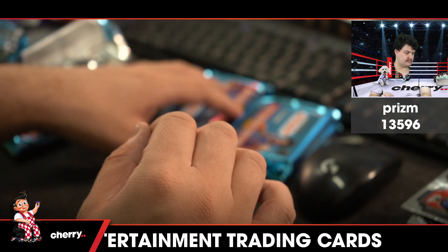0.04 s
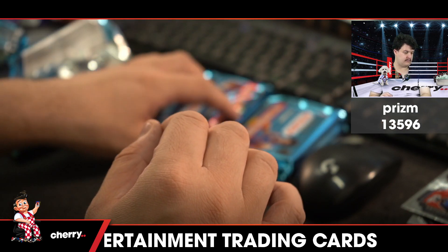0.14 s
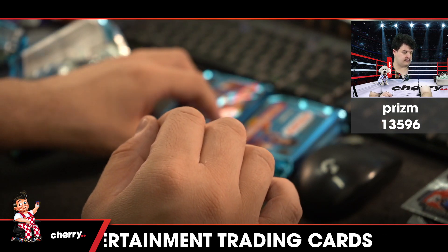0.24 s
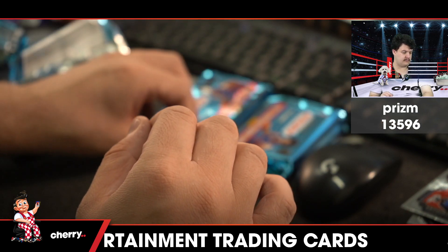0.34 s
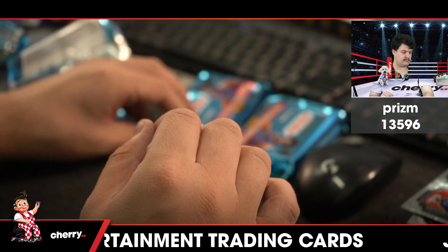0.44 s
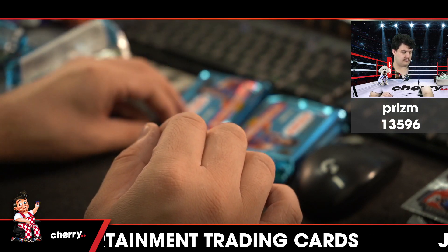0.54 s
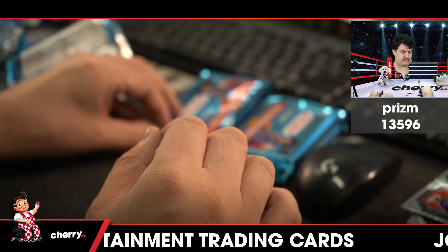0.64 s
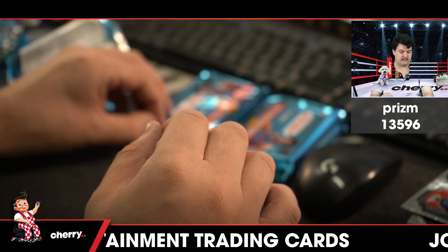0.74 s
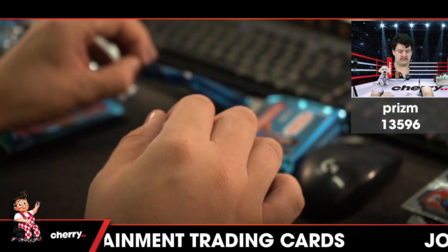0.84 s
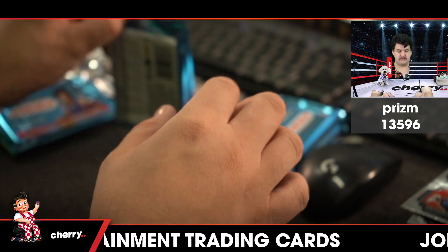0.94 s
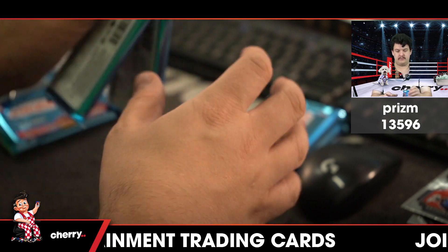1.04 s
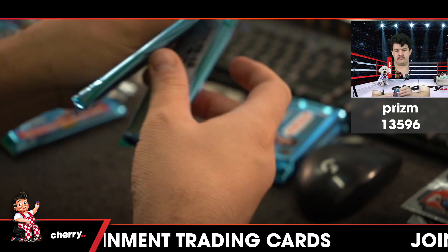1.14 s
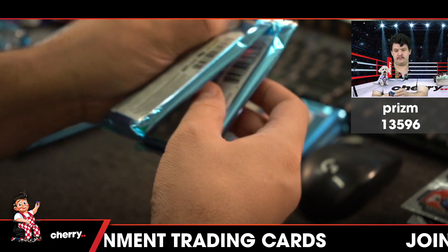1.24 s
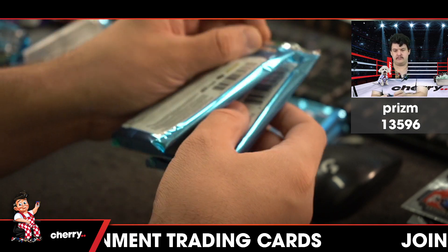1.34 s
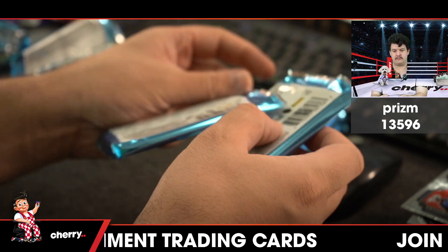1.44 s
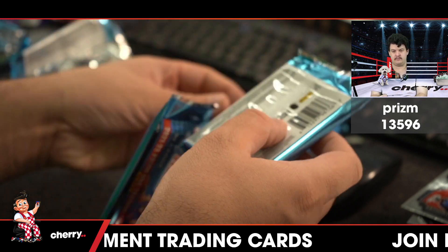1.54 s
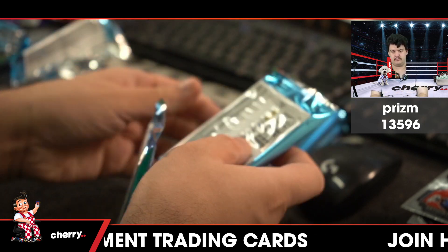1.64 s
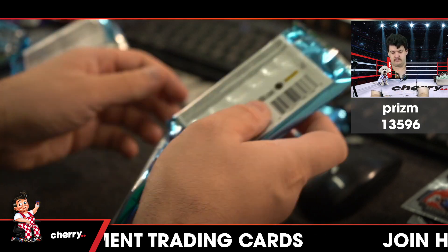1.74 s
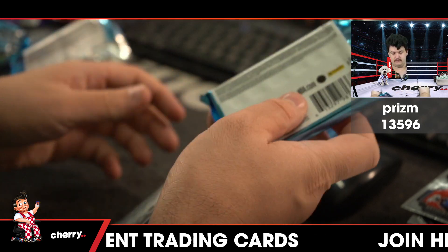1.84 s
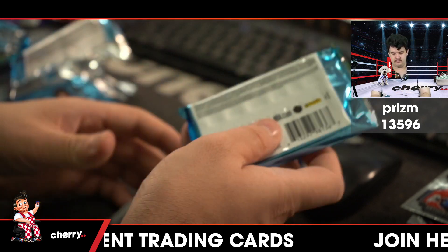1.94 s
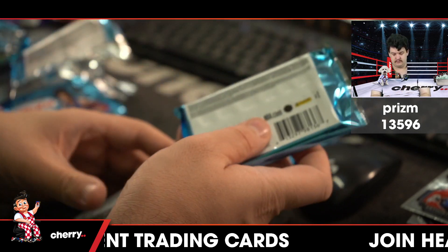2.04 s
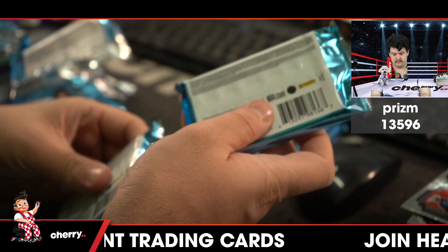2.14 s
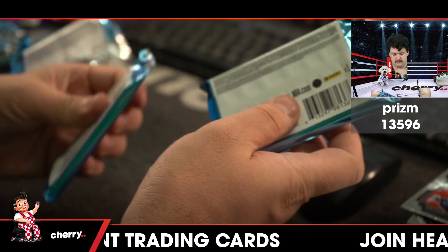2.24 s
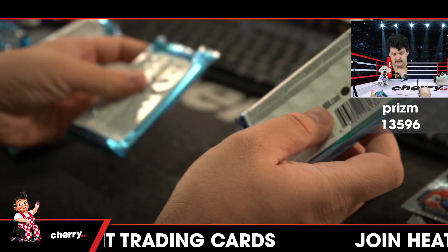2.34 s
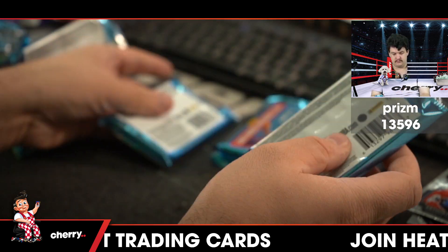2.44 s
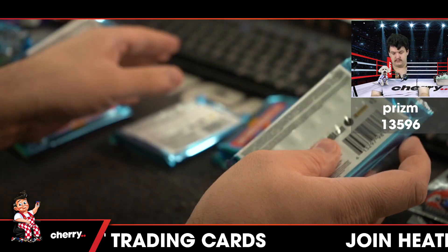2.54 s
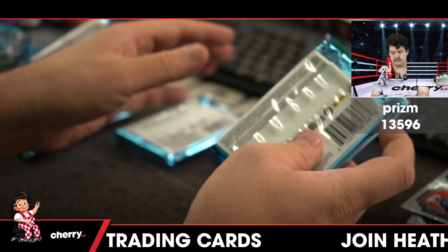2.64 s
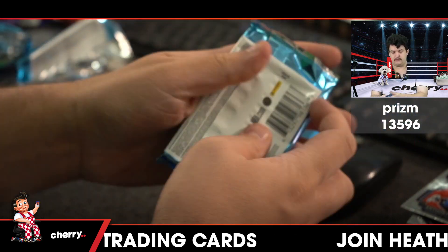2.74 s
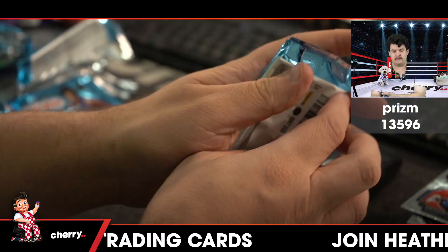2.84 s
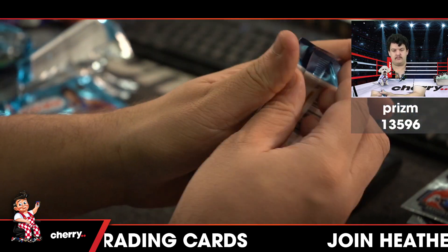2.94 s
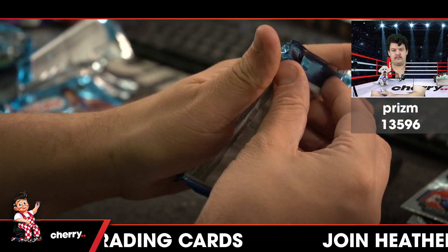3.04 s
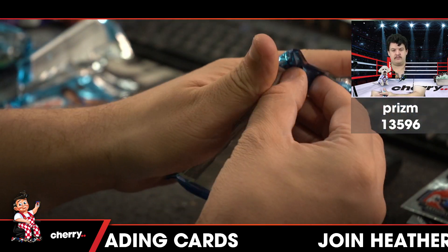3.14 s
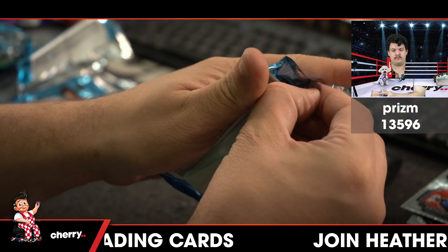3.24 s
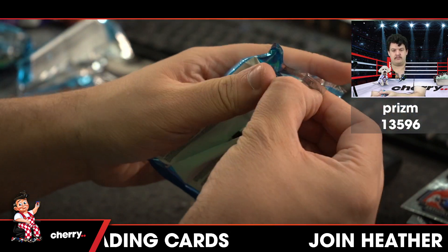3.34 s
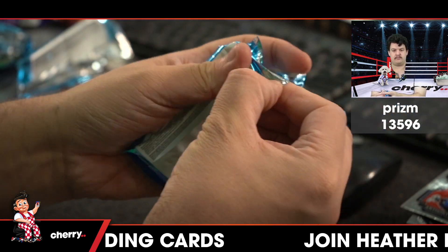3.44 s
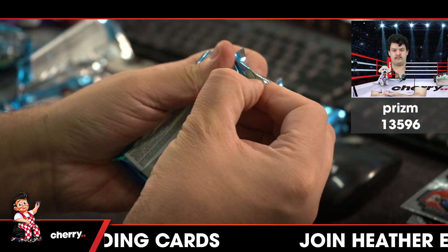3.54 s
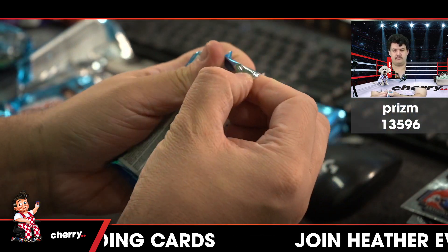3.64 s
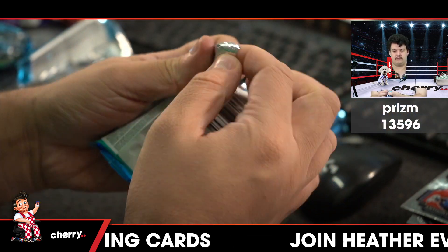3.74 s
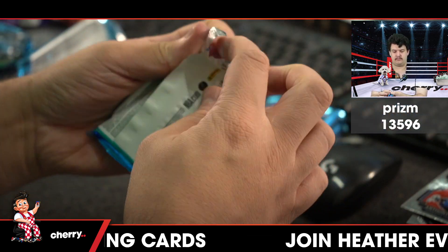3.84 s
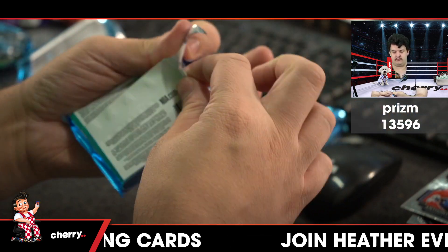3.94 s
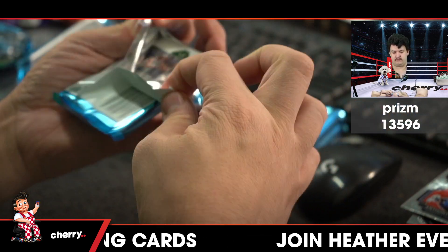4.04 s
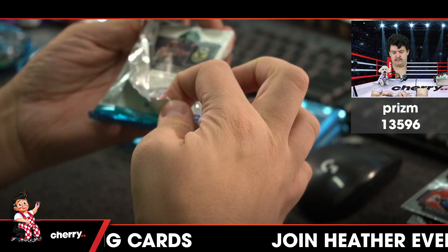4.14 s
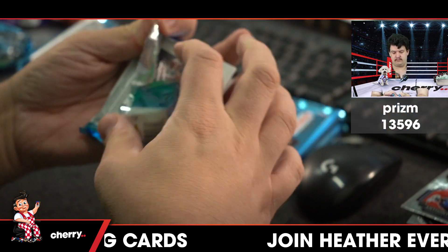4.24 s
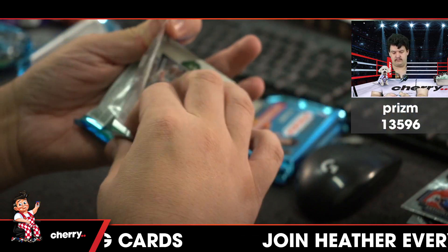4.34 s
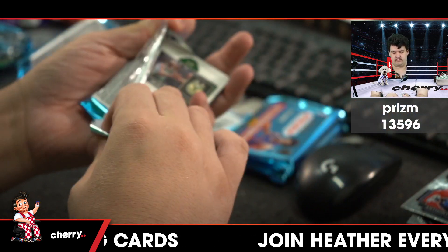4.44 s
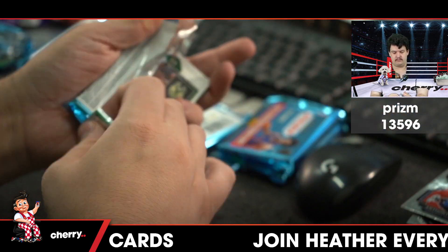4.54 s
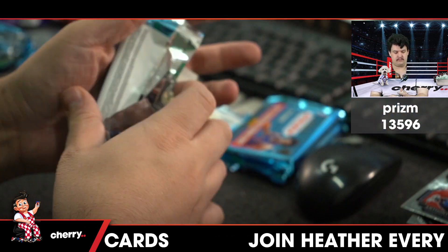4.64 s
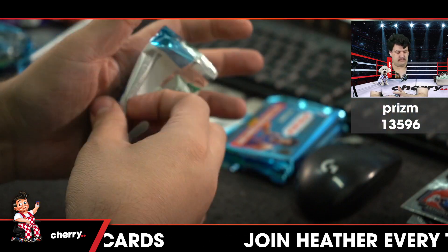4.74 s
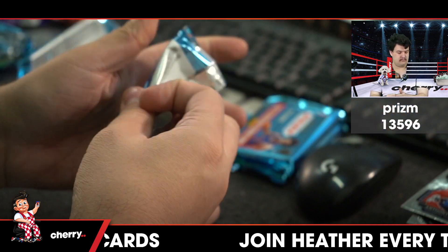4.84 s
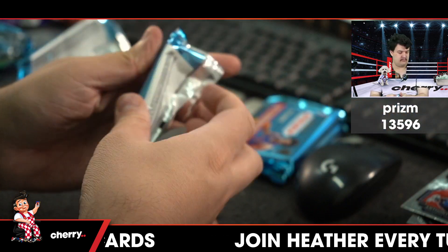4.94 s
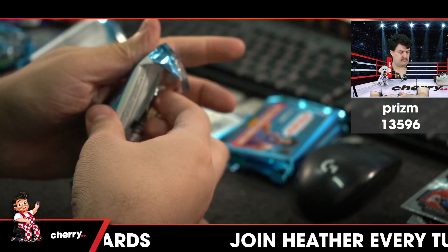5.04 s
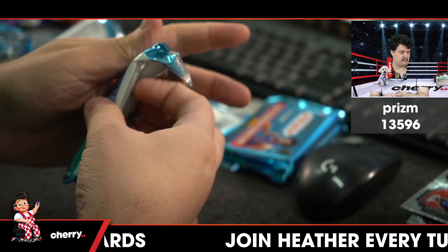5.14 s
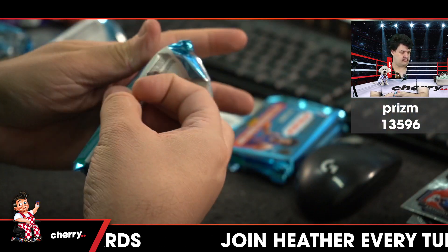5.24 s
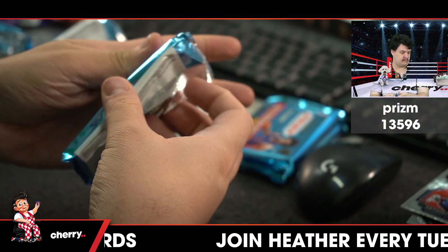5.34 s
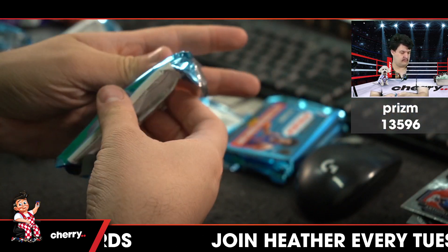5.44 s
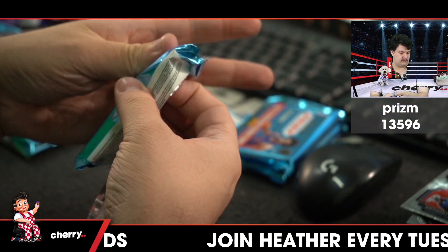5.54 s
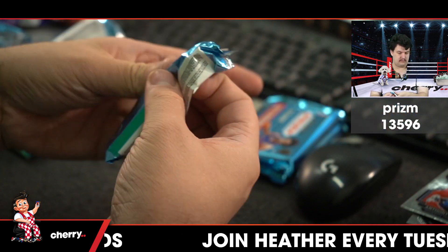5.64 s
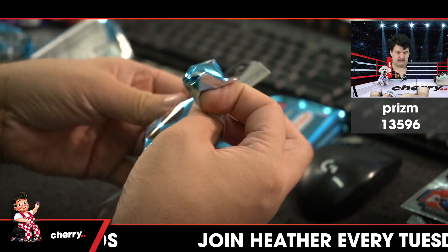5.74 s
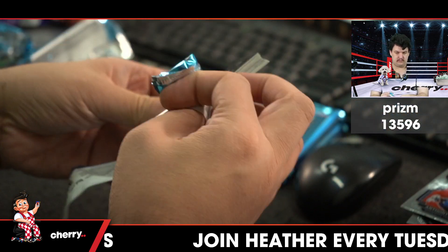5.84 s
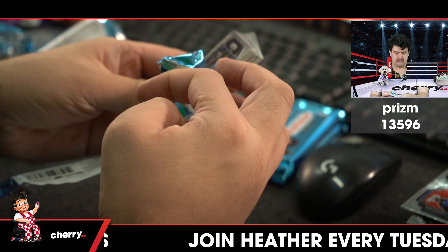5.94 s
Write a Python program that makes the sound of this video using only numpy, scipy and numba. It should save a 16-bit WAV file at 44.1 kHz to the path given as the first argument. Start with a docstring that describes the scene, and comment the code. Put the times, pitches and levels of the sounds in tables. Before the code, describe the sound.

Foil packs are picked up and crinkled close by, one drops softly on a desk, then after a lull the wrapper tears in dense crackles.

```python
"""Foil pack of cards handled over a desk in a small room, close to one microphone, for six seconds.
Hands take up the pack: a faint rustle grows into crackle, creases buckle in sharp snaps and the cards tap dully.
At 1.6 s a pack drops and the desk booms in its modes; a lull follows, with a weaker drop at 2.6 s.
From 2.8 s turning and tearing resume: coloured noise hisses, and resonant noise bursts snap more densely.
Throughout, the snaps and taps excite a decaying room tail, over a low murmur and faint hiss."""
import sys
import numpy as np
from scipy import signal
from scipy.fft import rfft, irfft, next_fast_len
from scipy.io import wavfile
from scipy.ndimage import uniform_filter1d
from numba import njit

SR = 44100
rng = np.random.default_rng(int(sys.argv[2]) if len(sys.argv) > 2 else 0)


def dump_mix(stems):
    """Bounce the given channels to the path in sys.argv[1] as a 16-bit WAV at rate SR."""
    frames = np.atleast_2d(stems).T  # one column per channel
    limited = np.clip(frames, -1, 1)  # hard clip at full scale
    pcm = np.round(limited * 32767).astype(np.int16)
    wavfile.write(sys.argv[1], SR, pcm)


N = 263718

# Reverberation of the room: f/Hz, time to fall 60 dB/s
ROOM_DECAY = [(300, 0.33), (3000, 0.59), (12000, 0.15)]
# Spectrum of rubbing skin, also of the room murmur: f/Hz, relative level per Hz/dB
RUB_SPECTRUM = [(35, -61), (60, -12), (199, -3), (417, -4.5), (797, -5), (1300, -10.5), (1700, -16),
                (2600, -20), (3380, -31), (5720, -120)]
# Modes of the desk top: f/Hz, relative level before a random spread/dB, time to fall 60 dB/s
DESK_MODES = [(134.4, -5.5, 0.67), (334, -7.5, .2), (170.5, 0, 0.5), (203.8, -2.5, 0.49), (262.7, -7, 0.56),
              (305.6, -2.5, 0.38), (483, -12, 0.32), (715, -14, 0.088)]
# A pack lands on the desk: t/s, nominal peak level/dB
DROPS = [(1.61, -24.5), (2.62, -33.5)]
# Spectrum of the foil: f/Hz, relative level per Hz/dB
FOIL_SPECTRUM = [(710, -23), (1200, -15), (1990, -12.5), (2420, -18), (2850, -8), (3360, -4.5),
                 (4470, -4.5), (5270, -4.5), (6430, -7), (8640, -6), (13500, -12.5), (15800, -18.5),
                 (16500, -57)]
# Fingers resting and shifting on the pack: t/s, foil rustle level/dB, rubbing level before RUB_GAIN_DB/dB
RESTING_GRIP = [(0, -89, -85), (.095, -83, -79), (.12, -71.5, -79), (.25, -62, -58), (.62, -57.5, -67),
                (1.1, -50, -61), (1.33, -58, -68), (1.86, -62, -62), (2.22, -65.5, -64.5),
                (2.44, -74, -77.5), (2.5, -70, -81), (2.53, -62, -67.5), (3.16, -60.5, -65),
                (3.9, -55, -62), (4.25, -60, -55.5), (4.6, -48.5, -61), (5.1, -52.5, -60.5),
                (5.33, -57, -63), (5.98, -48.5, -70)]
# One squeeze, turn or tear each: t of peak/s, peak level/dB, time to rise 10 dB/ms, time to fall 10 dB/ms,
# graininess (0-1)
SQUEEZES = [(.301, -40, 40, 110, .5), (.419, -45, 60, 38, 0.6), (0.562, -51.5, 115, 78, 0.68),
            (.657, -53.5, 48, 83, 0.38), (.789, -48.5, 50, 250, 0.7), (1.005, -46, 60, 150, 0.86),
            (1.226, -48.5, 150, 97, .7), (1.431, -42.5, 52, 129, 0.68), (1.665, -49.5, 19, 302, 0.67),
            (1.771, -48, 100, 57, 0.7), (2.06, -43, 105, 38, 0.61), (2.207, -51.5, 78, 21, 0.45),
            (2.802, -41.5, 6.5, 66, 0.68), (2.955, -46, 62, 122, 0.57), (3.227, -36.5, 21, 38, 0.4),
            (3.338, -39.5, 114, 100, 0.96), (3.437, -28.5, 43, 49, 0.56), (3.623, -43, 46, 90, 0.84),
            (3.734, -36.5, 27, 17, 0.85), (3.874, -44.5, 152, 100, 0.67), (4.034, -33, 57, 100, 0.6),
            (4.09, -25, 49, 40, 0.62), (4.124, -34.5, 30, 27, .4), (4.394, -32, 74, 23, 0.66),
            (4.49, -39.5, 150, 112, 0.8), (4.802, -40.5, 176, 52, 0.77), (4.997, -44, 50, 50, 0.54),
            (5.22, -45, 154, 62, .65), (5.472, -48, 150, 100, 0.73), (5.59, -39, 58, 76, .7),
            (5.767, -35, 36, 70, .45), (5.975, -42.5, 150, 100, 0.75)]
# Modes of the stack of cards in its wrapper: f/Hz, width of one resonator (used squared)/Hz, level/dB
PACK_MODES = [(570, 860, 7.5), (915, 170, -17), (1633, 670, 5)]
# The stack flexes or taps inside the wrapper: t/s, peak level/dB, f/Hz
KNOCKS = [(0.232, -46.5, 513), (0.2932, -35.5, 630), (0.3492, -32, 524), (0.9947, -44, 726),
          (1.0935, -39.5, 1750), (1.2135, -33.5, 1880), (1.228, -33.5, 494), (1.3386, -40, 1680),
          (1.374, -43.5, 2080), (1.4927, -37.5, 860), (1.601, -43, 710), (1.7803, -37.5, 1170),
          (1.8783, -44, 2080), (1.9355, -40.5, 730), (1.9612, -26.5, 550), (2.7993, -43, 830),
          (2.9401, -41, 1670), (3.0778, -41, 1250), (3.1759, -40.5, 1970), (3.2323, -37.5, 1830),
          (3.3387, -46, 600), (3.3983, -34, 550), (3.4601, -37.5, 595), (3.6141, -41, 1600),
          (3.6367, -36.5, 1520), (3.6642, -38, 448), (3.7427, -40, 517), (3.7653, -40, 600),
          (3.8693, -39, 644), (3.9569, -41, 1690), (3.9863, -50, 590), (4.0237, -34.5, 1740),
          (4.0884, -34, 700), (4.2022, -42.5, 597), (4.2635, -41, 1550), (4.6898, -44.5, 830),
          (4.8133, -36.5, 530), (4.8992, -32.5, 1900), (4.9308, -38, 1810), (4.951, -37, 860),
          (5.0762, -40.5, 1030), (5.6634, -48.5, 1600), (5.7751, -31.5, 597), (5.8307, -42.5, 560),
          (5.883, -40.5, 774)]
# Creases buckling that stand out from the rustle around them: t/s, nominal peak level/dB, centre f/Hz,
# nominal length/ms
SNAPS = [(0.106, -53, 4600, 7.2), (0.2143, -45, 3900, 2), (0.238, -38, 4530, 2.5), (0.262, -36, 5070, 3.8),
         (0.2964, -22.5, 6100, 1.1), (0.342, -30, 5100, 3.6), (0.4019, -25, 5200, 1.6),
         (0.4088, -23.5, 5250, 1.2), (0.5531, -36, 5300, 1.5), (0.6408, -34, 5730, 3.1),
         (0.7496, -33.5, 5330, 4.9), (0.775, -29.5, 5600, 2.4), (0.7894, -27, 5600, 0.83),
         (0.7943, -27, 8000, 1.6), (0.8469, -32.5, 7540, 1.1), (0.8679, -35, 4900, 1.2),
         (0.8929, -27, 5600, 0.96), (0.9104, -28.5, 5300, 1.8), (0.9223, -29, 4180, 1.2),
         (0.973, -31, 4900, 1.2), (0.995, -24, 6050, 2.1), (1.011, -22, 5700, 1.3),
         (1.0369, -33, 4230, 1.8), (1.0691, -19, 4300, 0.72), (1.0946, -19.5, 4100, 1.24),
         (1.1154, -25, 5500, 1.15), (1.1206, -25.5, 6800, 1.1), (1.147, -34, 6200, 3.7),
         (1.1775, -25.5, 6000, 2), (1.183, -27.5, 7700, 1.8), (1.2078, -25, 4530, 1.1),
         (1.215, -20.5, 4440, 2.6), (1.247, -28, 4600, 0.94), (1.2548, -26, 7800, 1.3),
         (1.267, -19, 4940, 0.46), (1.3398, -24, 5670, 1.4), (1.375, -25.5, 5630, 1.4),
         (1.391, -28.5, 6100, 2), (1.4203, -30, 5700, 2.4), (1.426, -21, 5040, 2.5),
         (1.4446, -21.5, 6400, 1.1), (1.4608, -23, 7650, 1.1), (1.477, -24.5, 7000, 1.5),
         (1.493, -24.5, 5340, 2.4), (1.504, -25.5, 5500, 1.4), (1.511, -23, 5350, 1.4),
         (1.537, -24.5, 6240, 4.5), (1.55, -28, 6400, 2.9), (1.6042, -31.5, 6400, 4.3),
         (1.6296, -25.5, 6000, 1.4), (1.651, -29.5, 5170, 4.5), (1.6818, -30, 5370, 1.7),
         (1.781, -28.5, 4540, 2.3), (1.8774, -36, 4660, 4.3), (1.88, -31.5, 3980, 4.7),
         (1.9564, -23.5, 3940, 7.1), (2.1486, -43.5, 4260, 18), (2.3482, -46, 4900, 1.7),
         (2.514, -51, 4200, 2.4), (2.621, -42, 4800, 2.9), (2.6586, -42.5, 3640, 0.88),
         (2.7965, -38, 4340, 1.7), (2.8243, -30.5, 5600, 2.4), (2.8506, -28, 7300, 1.4),
         (2.9126, -28.5, 7800, 1.8), (2.9191, -32, 6300, 1.7), (2.9407, -22.5, 7200, 2.5),
         (2.993, -30.5, 4250, 2.9), (3.0536, -43, 4300, 1.2), (3.0785, -36, 4800, 1.6),
         (3.0837, -29.5, 6200, 1.6), (3.1106, -37, 7800, 1.7), (3.1432, -45, 4500, 2),
         (3.1766, -22.5, 5400, 1.6), (3.1926, -17, 4660, 0.91), (3.2102, -28, 6900, 2.2),
         (3.2193, -28, 5340, 2), (3.23, -21, 6000, 7.7), (3.237, -22.5, 5760, 1.4),
         (3.2626, -29, 6000, 1.6), (3.28, -23.5, 7900, 1.1), (3.3059, -22.5, 6400, 2.7),
         (3.3232, -26, 4700, 1.6), (3.3293, -23, 5840, 1.5), (3.3394, -16, 5700, 1.2),
         (3.366, -24, 5300, 1.1), (3.392, -25, 6040, 1.3), (3.3976, -19, 7200, 3.6),
         (3.5197, -29, 4600, 1.9), (3.5383, -26, 6170, 1.5), (3.5511, -26.5, 3570, 2.2),
         (3.594, -28.5, 3600, 3), (3.613, -25.5, 4520, 2.1), (3.6277, -19.5, 3960, 0.64),
         (3.652, -27, 4500, 1.3), (3.6647, -27.5, 5400, 2.3), (3.674, -24.5, 3400, 2),
         (3.742, -24.5, 4660, 3.1), (3.765, -21, 7000, 3), (3.7886, -23.5, 4460, 1.4),
         (3.8042, -24, 3220, 1.1), (3.8127, -25.5, 7750, 1.3), (3.8277, -21, 4430, 1.1),
         (3.836, -22.5, 5500, 1.6), (3.8445, -23, 6840, 1.9), (3.8662, -24, 8900, 4.1),
         (3.8681, -28, 4840, 5.2), (3.8881, -16.5, 5200, 0.71), (3.951, -25.5, 6300, 2.9),
         (3.9574, -21.5, 4700, 1.9), (3.975, -22.5, 4800, 2.2), (3.9877, -11.5, 4500, 0.25),
         (3.993, -23.5, 4040, 1.3), (4.0246, -19, 4470, 5), (4.0492, -16, 4480, 2.1),
         (4.1082, -23, 7800, 1.5), (4.1229, -19.5, 5670, 2.3), (4.136, -21.5, 7000, 5.2),
         (4.1518, -18.5, 7000, 1.5), (4.1646, -26, 5700, 2.1), (4.1955, -26, 6000, 1.2),
         (4.2032, -21, 4700, 1.3), (4.235, -23, 4460, 2), (4.2648, -28, 6200, 0.88),
         (4.284, -32.5, 7100, 2.5), (4.3154, -23.5, 6700, 2.9), (4.3446, -26, 4300, 2.5),
         (4.401, -19.5, 5550, 3.2), (4.4478, -14.5, 5300, 1.3), (4.46, -25, 6100, 1.9),
         (4.481, -26, 5200, 2.1), (4.4905, -21, 5200, 1.9), (4.4997, -24, 5550, 3.4),
         (4.5333, -25.5, 7160, 1.6), (4.561, -26.5, 4870, 3.9), (4.5981, -23, 7500, 1.4),
         (4.6158, -27.5, 4660, 2), (4.6325, -27, 8150, 1.6), (4.6508, -28, 7200, 1.6),
         (4.6907, -27, 4600, 0.99), (4.8005, -28, 6070, 1.3), (4.8179, -25, 7300, 0.84),
         (4.8916, -25.5, 3320, 1.1), (4.899, -27, 5100, 4.3), (4.9314, -29, 5800, 1.9),
         (4.95, -24, 6350, 2.2), (4.986, -22.5, 5500, 1.16), (5.0437, -25, 5430, 2.4),
         (5.077, -26.5, 3520, 1.1), (5.0957, -29, 5400, 2.5), (5.1107, -24, 5060, 1.5),
         (5.1569, -27.5, 4320, 2.0), (5.1858, -22, 5640, 0.48), (5.1928, -30, 3660, 1.9),
         (5.2093, -30.5, 5100, 2.6), (5.2341, -25, 5400, 3.2), (5.2907, -40, 4800, 2.1),
         (5.35, -36.5, 3780, 3), (5.3853, -19, 7250, 2.7), (5.454, -31, 3800, 1.4),
         (5.469, -29, 4840, 0.65), (5.4727, -31, 7500, 3.5), (5.523, -37, 7500, 1.6),
         (5.542, -22.5, 4860, 1.2), (5.5456, -23.5, 7300, 1.15), (5.559, -28, 5400, 2.9),
         (5.58, -22, 5130, 0.96), (5.5941, -21.5, 5500, 2.1), (5.6234, -18, 5200, 1.4),
         (5.6662, -22.5, 5400, 1.2), (5.7189, -30, 7550, 1.4), (5.7398, -25, 5960, 0.68),
         (5.7449, -23.5, 7200, 1.6), (5.7621, -28, 8400, 3.1), (5.784, -24, 6500, 0.58),
         (5.7987, -22.5, 8100, 3.9), (5.831, -24, 5700, 1.8), (5.8742, -30, 6100, 1.5),
         (5.8836, -16, 5060, 2.1), (5.9267, -21.5, 6600, 1.55), (5.9398, -28, 5100, 2.3),
         (5.971, -24, 5800, 2.5)]

BAND_LIMIT_HZ = 16979
BURST_SAMPLES = 1024
LEAD_SAMPLES = 32  # room ahead of each burst's onset
RUB_AT_DB, RUB_GROWS = -59.5, 0.55  # rubbing in a squeeze of -45 dB, before the gain; dB per dB of squeeze
RUB_GAIN_DB = 1.0
REST_GRAINY = 0.4  # graininess between squeezes, 0-1


def amp(db):
    """Definition of level: the amplitude gain of a value in dB."""
    return 10 ** (np.asarray(db) / 20)


def unit(x):
    """Normalisation by power: x at rms 1."""
    return x / np.sqrt(np.mean(x ** 2) + 1e-20)


def along(points, hz):
    """Interpolation of (f, value) points on a logarithmic frequency axis."""
    f, value = np.transpose(points)
    return np.interp(np.log(hz + 1), np.log(f + 1), value)


def filtered(x, response):
    """Linear filtering: the spectrum of x times a complex response of frequency."""
    size = next_fast_len(N + SR // 2)
    spectrum = rfft(x, size) * response(np.fft.rfftfreq(size, 1 / SR))
    return irfft(spectrum, size)[:N]


def resonance(f, hz, width_hz):
    """Damped oscillator: causal response of one mode, 1 at its centre."""
    return 1j * f * width_hz / (hz * hz - f * f + 1j * f * width_hz)


def patchy(spectrum, patchy_db):
    """Filtered noise of rms 1 whose colour flickers in small patches of time and frequency."""
    z = signal.stft(rng.standard_normal(N), nperseg=256)[2]
    field = uniform_filter1d(rng.standard_normal(z.shape), size=5, axis=0)
    field = uniform_filter1d(field, size=4, axis=1)
    noise = signal.istft(z * amp(patchy_db * unit(field)), nperseg=256)[1][:N]
    return unit(filtered(noise, lambda f: amp(along(spectrum, f))))


def bursts(length_ms, response, size):
    """Transient excitation: a noise pulse per row, coloured by its response, with short-time peak level 1."""
    u = np.arange(size) / SR / (length_ms[:, None] / 1000 + 1e-4)  # time in lengths, each 0.1 ms longer
    shape = u ** 1.04 * np.exp(-3.1 * u)  # the crease runs, then lets go
    x = np.roll(rng.standard_normal(u.shape) * shape, LEAD_SAMPLES, axis=1)
    x = irfft(rfft(x) * response(np.fft.rfftfreq(size, 1 / SR)), size)
    power = uniform_filter1d(x ** 2, size=30)
    return x / np.sqrt(2 * power.max(axis=1, keepdims=True))


def placed(s, rows):
    """Superposition: rows of samples summed at their times."""
    start = np.round(s * SR).astype(int)[:, None] - LEAD_SAMPLES
    at = np.clip(start + np.arange(rows.shape[1]), 0, N)
    return np.bincount(at.ravel(), rows.ravel(), N + 1)[:N]


def floor():
    """Stationary background: a low murmur of the room over a faint microphone hiss."""
    murmur = amp(-78.5) * patchy(RUB_SPECTRUM, patchy_db=4.5)
    return murmur + amp(-87) * rng.standard_normal(N)


def room(x):
    """Reverberation: each frequency of the room's answer dies at its own speed."""
    hz, t, z = signal.stft(rng.standard_normal(SR // 2), SR, nperseg=256)
    decay = amp(-60 * t / along(ROOM_DECAY, hz)[:, None])
    tail = signal.istft(z * decay, SR, nperseg=256)[1]
    delayed = np.pad(x, (150, 0))  # samples
    return signal.fftconvolve(delayed, tail / np.linalg.norm(tail))[:N]


def drops():
    """Modal vibration: a soft blow rings the desk top's low modes, slightly rough as their phases wander."""
    out, t = np.zeros(N + SR), np.arange(SR // 2) / SR
    for s, db in DROPS:
        ring = np.zeros(len(t))
        for hz, mode_db, t60 in DESK_MODES:
            level_db = mode_db + rng.normal(0, 0.99) - 60 * t / t60
            phase_drift = np.cumsum(rng.normal(0, 0.024, len(t)))
            ring += amp(level_db) * np.sin(2 * np.pi * hz * t + phase_drift)
        thud = 1 + 3.4 * np.exp(-t / 0.007)  # the first swings are the strongest
        onset = 1 - np.exp(-t / 0.0034)
        out[round(s * SR):][:len(t)] -= amp(db - 10) * ring * thud * onset
    return filtered(out[:N], lambda f: 1j * f / (110 + 1j * f))  # keeps the boom above about 110 Hz


def effort():
    """Masking by the strongest: rustle dB, rubbing dB and graininess of the top squeeze or resting grip."""
    t = np.arange(0, N / SR + 0.001, 0.001)
    s, *columns = np.transpose(RESTING_GRIP)
    rest_db, skin_db = [np.interp(t, s, c) for c in columns]
    s, db, rise, fall, grain = np.transpose(SQUEEZES)[..., None]
    each_db = db - 10 * np.abs(t - s) * 1000 / np.where(t < s, rise, fall)
    squeeze_db = each_db.max(axis=0)
    strongest = each_db.argmax(axis=0)
    grainy = np.where(squeeze_db > rest_db, grain[strongest, 0], REST_GRAINY)
    grainy = uniform_filter1d(grainy, size=15)
    rustle_db = np.maximum(rest_db, squeeze_db)
    rub_db = np.maximum(skin_db, RUB_AT_DB + RUB_GROWS * (squeeze_db + 45))
    return [np.interp(np.arange(N) / SR, t, c) for c in (rustle_db, rub_db, grainy)]


def crease(hz, broad_db):
    """Resonant radiation: a crease rings at its own size and a random second one, in the foil's colour."""
    own = hz[:, None]
    second = (hz * np.exp(rng.normal(0, 0.42, len(hz))))[:, None]

    def response(f):
        ring = resonance(f, own, 0.36 * own) + 0.31 * resonance(f, second, 0.078 * second)
        return amp(along(FOIL_SPECTRUM, f)) * (ring + amp(broad_db))
    return response


def handling():
    """Friction and crackling noise: sliding or tearing foil hisses, tiny creases crackle, skin rubs."""
    rustle_db, rub_db, grainy = effort()
    count = 4000
    when = rng.uniform(0, N / SR, count)
    size = amp(3.6 * rng.exponential(1, count).clip(0, 3.5))
    length_ms = 1.18 * np.exp(rng.normal(0, 0.67, count))
    hz = 5500 * np.exp(rng.normal(0, 0.27, count))
    tiny = bursts(length_ms, crease(hz, broad_db=-14.5), BURST_SAMPLES // 4)
    crackle = unit(placed(when, size[:, None] * tiny))
    grainy = np.clip(grainy, 0, 1)
    hiss = patchy(FOIL_SPECTRUM, patchy_db=5.0)
    rustle = 1.55 * grainy * crackle + (1 - 0.75 * grainy) * hiss
    dull = filtered(rustle, lambda f: 1 / (1 + (f / 9000) ** 2))
    force = np.clip((rustle_db + 81) / 45, 0, 1)  # gentle handling is duller than tearing
    rustle = dull + force * (rustle - dull)
    rub = patchy(RUB_SPECTRUM, patchy_db=3.5)
    return amp(rustle_db) * rustle + amp(rub_db + RUB_GAIN_DB) * rub


def pack(f):
    """Modal superposition: the response of the pack's modes together."""
    return sum(amp(db) * resonance(f, hz, width_hz) ** 2 for hz, width_hz, db in PACK_MODES)


def knocks():
    """Modal excitation: in a dull tap one mode stands out over the rest of the pack."""
    s, db, hz = np.transpose(KNOCKS)
    centre = hz[:, None]

    def tone(f):
        return resonance(f, centre, 250 + 0.2 * centre) ** 2 + amp(-16) * pack(f)
    taps = bursts(np.full(len(s), 2.5), tone, BURST_SAMPLES)
    return placed(s, amp(db)[:, None] * taps)


def snaps():
    """Buckling instability: a crease ticks, rings, answers off the desk and faintly jolts the pack."""
    s, db, hz, ms = np.transpose(SNAPS)
    # The treble is over first
    tick = bursts(0.19 * ms, lambda f: amp(along(FOIL_SPECTRUM, f)) * f, BURST_SAMPLES)
    click = bursts(ms, crease(hz, broad_db=-9.5), BURST_SAMPLES) + amp(-13) * tick
    desk_answer = amp(-17.5) * np.roll(click, round(0.0034 * SR), axis=1)
    jolt = amp(-22.5) * bursts(ms, pack, BURST_SAMPLES)
    return placed(s, amp(db)[:, None] * (click + desk_answer + jolt))


def scene():
    """Superposition at one microphone, which feeds both channels."""
    near = knocks() + snaps()
    echo = amp(-15) * room(near)
    mono = floor() + echo + drops() + handling() + near
    return np.array([mono, mono])


@njit
def follow(x, rise, fall):
    """First-order relaxation: an envelope that rises and falls at separate rates per sample."""
    out, level = np.empty_like(x), 0.
    for i in range(len(x)):
        level += (rise if x[i] > level else fall) * (x[i] - level)
        out[i] = level
    return out


def record(dry):
    """Rectification and relaxation: treble peaks pull the zero line down, it drifts back; then a band limit."""
    treble = np.abs(filtered(dry[0], lambda f: f > 2500))
    sag = 0.15 * follow(treble, 1 / (0.00037 * SR), 1 / (0.016 * SR))  # time constants in s
    out = filtered(dry[0] - sag, lambda f: f < BAND_LIMIT_HZ)
    return np.array([out, out])


dry = scene()
out = record(dry)
dump_mix(out)
```